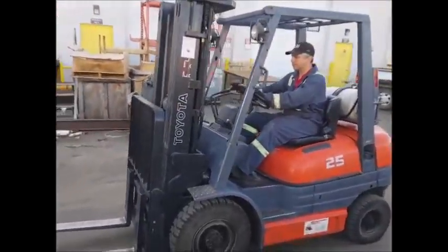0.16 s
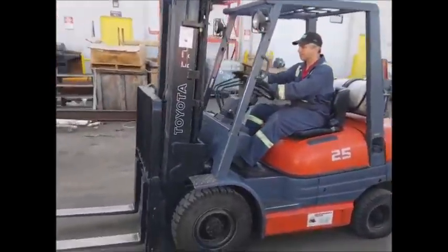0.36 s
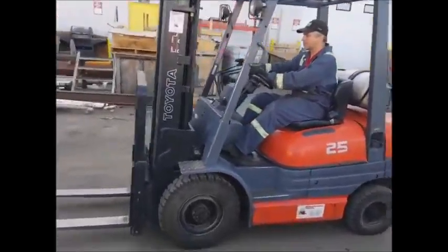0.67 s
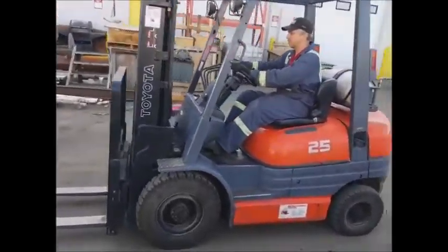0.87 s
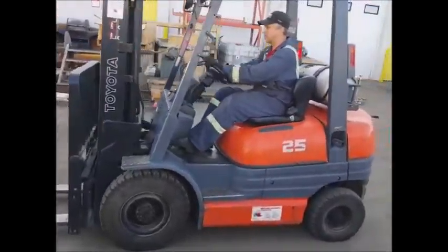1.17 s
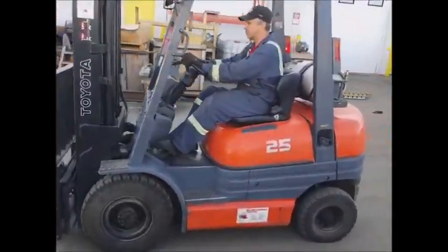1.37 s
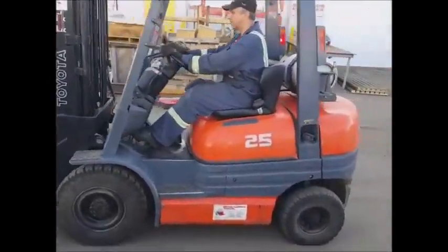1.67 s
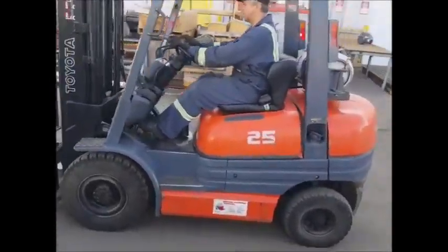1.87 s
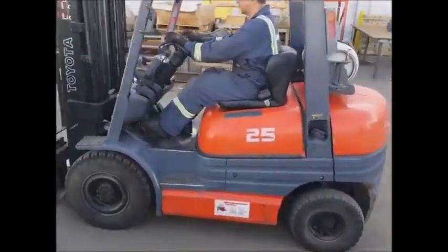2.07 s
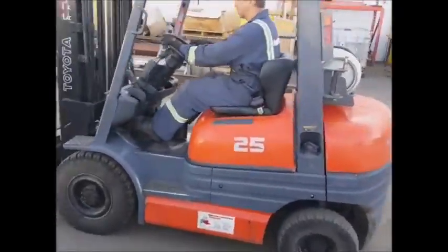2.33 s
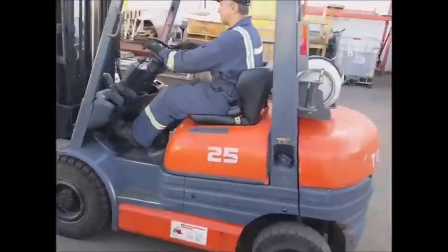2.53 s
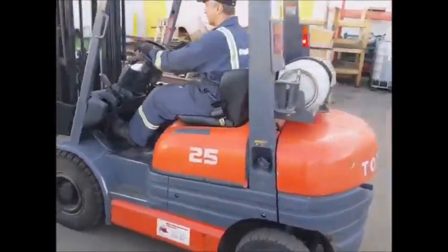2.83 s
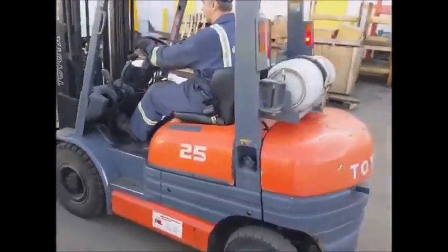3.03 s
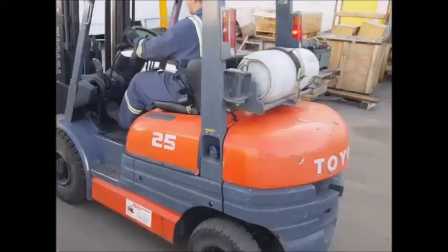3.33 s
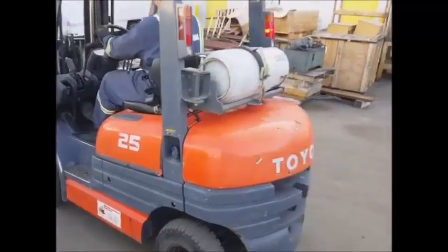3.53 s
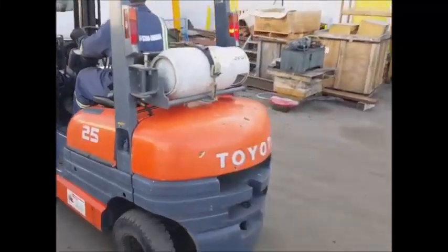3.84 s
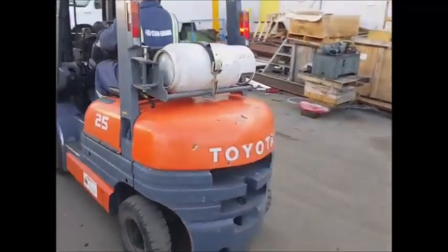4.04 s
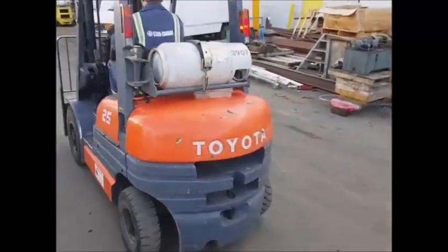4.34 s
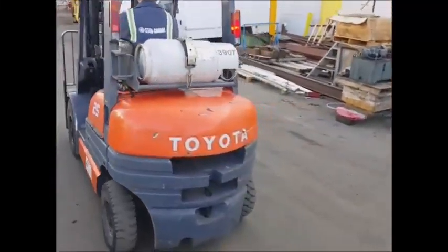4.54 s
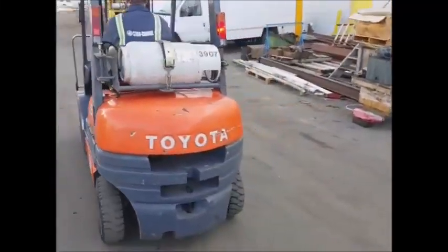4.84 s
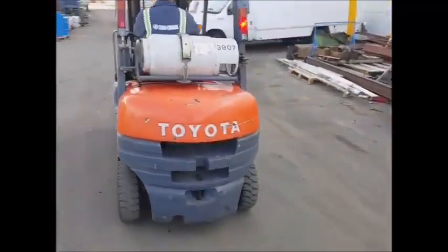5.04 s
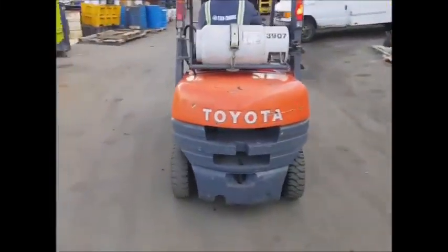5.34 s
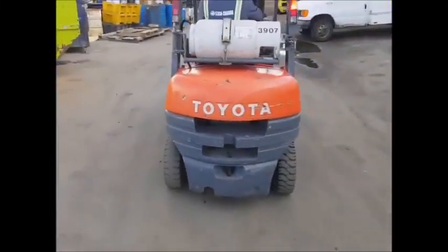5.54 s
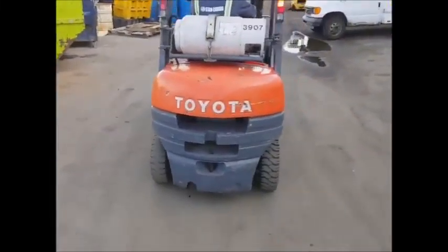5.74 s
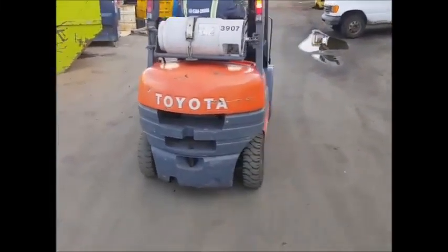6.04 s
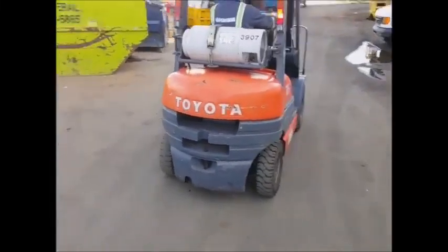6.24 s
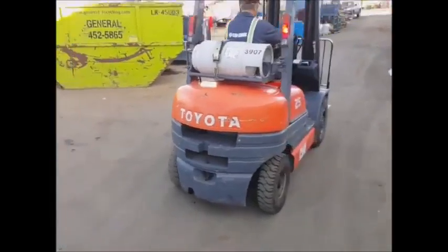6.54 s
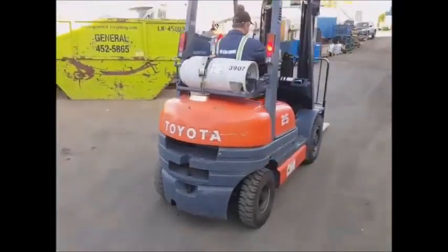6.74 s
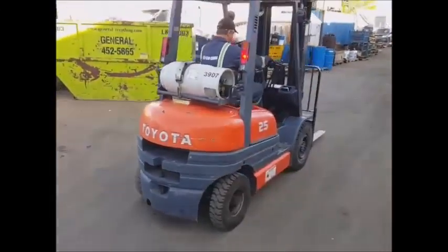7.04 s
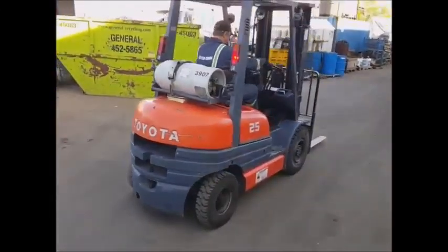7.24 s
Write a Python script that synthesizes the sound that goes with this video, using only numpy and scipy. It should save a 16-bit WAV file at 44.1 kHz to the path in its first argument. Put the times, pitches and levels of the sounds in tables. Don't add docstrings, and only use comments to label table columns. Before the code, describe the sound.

A quiet, steady engine drone with rushing air and light tyre scrub opens the scene; the engine bogs and picks up again as the forklift creeps and turns away. Thin, fine buzzing comes from the handheld microphone itself, stronger on the left, with small low wind bumps. In the last second the pickup switches abruptly, bringing a heavy throbbing drone, clearer whines, less hiss, and a single hard little knock.

```python
import sys
import numpy as np
from scipy import signal
from scipy.io import wavfile

SR = 44100
rng = np.random.default_rng(int(sys.argv[2]) if len(sys.argv) > 2 else 0)


def waveform_to_disk(signal):
    frames = np.transpose(np.atleast_2d(signal))
    scaled = np.clip(frames, -1, 1) * 32767
    samples = np.round(scaled).astype(np.int16)
    wavfile.write(sys.argv[1], SR, samples)


def to_linear_factor(level_db):
    exponent = np.asarray(level_db, float) / 20
    return 10 ** exponent


N = 326340
T = np.arange(N) / SR
SWITCH_S = 6.5072
AFTER = T >= SWITCH_S
STEADY_HZ = 59.1


def at_hz(points, hz):
    points = np.array(points)
    return np.interp(np.log(hz), np.log(points[:, 0]), points[:, 1])


def either(before, after):
    return np.where(AFTER, after, before)


def drift(rate):
    r = np.exp(-128 * np.pi * rate / SR)
    slow = signal.lfilter([1], [1, -2 * r, r * r], rng.standard_normal(N // 64 + 1502))[1500:]
    return slow / slow.std()


def fine(slow):
    return np.interp(np.arange(N) / 64, np.arange(len(slow)), slow)


def swell(middle, length):
    return np.exp(-.5 * (2 * (T - middle) / length) ** 2)


def panned(x, db):
    return np.array([x * to_linear_factor(db / 2), x * to_linear_factor(-db / 2)])


def band_pass(x, low, high):
    return signal.sosfilt(signal.butter(2, [low, high], "band", fs=SR, output="sos"), x)


def high_pass(x, low):
    return signal.sosfilt(signal.butter(2, low, "high", fs=SR, output="sos"), x)


def intake(hz):
    box_hz, box_width_hz = 226, 30
    return .2 + 1 / np.sqrt(1 + (2 * (hz - box_hz) / box_width_hz) ** 2)


def tone_levels(firing_hz, tail_db, intake_db):
    # (wide level [dB], aimed level [dB])
    tone_pairs = [(-41, -32.5), (-45.5, -26), (-57.5, -37)]
    firing, boom, exhaust = (either(*pair) for pair in tone_pairs)
    sag_db_per_hz = 0.5
    firing = firing + tail_db - sag_db_per_hz * (STEADY_HZ - firing_hz)
    return [firing, boom + intake_db, exhaust + 1.19 * tail_db]


def orders(cycle, firing_hz, levels_db, unsteady_db):
    # (multiple of the cycle rate, level [dB])
    wide_orders = [(1, -25), (2, -7), (3, -25), (4, 0), (5, -20), (6, -16), (7, -30.5), (8, -23), (9, -26),
                   (10, -25), (11, -22), (12, -36), (13, -16.5), (14, -18), (15, -5), (16, -46),
                   (17, -24.5), (18, -37), (19, -26), (20, -29), (21, -25.5), (22, -25.5), (23, -46),
                   (24, -28), (25, -28.5), (26, -37), (27, -28), (28, -26.5), (29, -28.5), (30, -28),
                   (31, -52.5), (32, -35), (33, -46), (34, -32.5), (35, -65), (36, -55)]
    aimed_orders = [(1, -35), (2, -22), (3, -27), (4, 0), (5, -33), (6, -8), (7, -22), (8, -17), (9, -20),
                    (10, -13), (11, -38), (12, -40.5), (13, -15), (14, -13), (15, -1.5), (16, -22),
                    (17, -29), (18, -44), (19, -28), (20, -34), (21, -22), (22, -17), (23, -38), (24, -20),
                    (25, -46), (26, -18.5), (27, -29), (28, -20), (29, -22.5), (30, -30), (31, -28),
                    (32, -22.5), (33, -35), (34, -33), (35, -37), (36, -52)]
    facing_orders = [22, 6, 8, 30, 34, 32, 28, 24]
    # (middle [s], length [s], rise [dB])
    facing_swells = [(2.7, 3.15, 8.5), (1.7, 0.9, 10), (1.37, 1, 13), (3.48, 1.17, 11), (5.55, 1.9, 10),
                     (3.715, 1.1, 10), (2.6, 1.9, 1.5), (5.5, 1.1, 5.5)]
    out = np.zeros(N)
    firing, boom, exhaust = to_linear_factor(np.array(levels_db))
    for (k, wide_db), (_, aimed_db) in zip(wide_orders, aimed_orders):
        if k < 11:
            level = firing * to_linear_factor(either(0, 1.9))
        else:
            if k < 21:
                level = boom * to_linear_factor(either(4.0, .6))
            else:
                level = exhaust * to_linear_factor(either(16.0, 11.0))
            level = level * intake(k * firing_hz / 4) / intake(k * STEADY_HZ / 4)
        if k in facing_orders:
            middle, length, db = facing_swells[facing_orders.index(k)]
            level = level * to_linear_factor(db * swell(middle, length))
        waver_db = unsteady_db * (-0.2 * drift(4.5) + k / 13 * drift(1.67))
        phase = k * cycle + fine(rng.uniform(0, 2 * np.pi) + 0.02 * k * drift(3.0))
        tone = fine(to_linear_factor(waver_db)) * np.sin(phase)
        out += either(to_linear_factor(wide_db), to_linear_factor(aimed_db)) * level * tone
    return np.sqrt(2) * out


def throb(cycle, turn_db, firing_db):
    return to_linear_factor(turn_db * np.cos(2 * cycle) + firing_db * np.cos(4 * cycle + 1.2))


def banded(band_edges, wide, aimed, patchy_db):
    # (frequency [Hz], likeness [-1 to 1])
    likeness = [(30, 0.87), (250, 0.949), (600, 0.44), (1200, 0.24), (2500, 0.25), (5000, 0.01),
                (16000, 0.01)]
    # (frequency [Hz], left minus right [dB])
    wide_lean = [(60, -6), (150, -6), (380, 6), (950, -2.5), (2380, -1.5), (5980, -0.5), (15000, 9)]
    aimed_lean = [(60, -2), (150, -1.5), (380, 7.5), (950, -3), (2380, -0.5), (5980, -1.5), (15000, 2.0)]
    out, together, white = 0, drift(7.0), rng.standard_normal((2, 2, N))
    half = np.array([[.5], [-.5]])
    for k, (low, high) in enumerate(zip(band_edges, band_edges[1:])):
        mid, side = band_pass(white[k % 2], low, high)
        hz = np.sqrt(low * high)
        alike = np.clip(at_hz(likeness, hz), -.9, .99)
        wide_gain = to_linear_factor(at_hz(wide, hz) + half * at_hz(wide_lean, hz))
        aimed_gain = to_linear_factor(at_hz(aimed, hz) + half * at_hz(aimed_lean, hz))
        flicker = 0.58 * together + drift(1.8) + 0.62 * drift(16.0)
        gain = either(wide_gain, aimed_gain) * fine(to_linear_factor(patchy_db * flicker))
        out = out + gain * (np.sqrt(1 + alike) * mid + np.sqrt(1 - alike) * side * [[1], [-1]])
    return out / either(out[:, ~AFTER].std(), out[:, AFTER].std())


def noise_levels():
    # (wide level [dB], aimed level [dB])
    noise_pairs = [(-54.5, -35), (-61.5, -45), (-56, -49.5)]
    # (wide change [dB/s], aimed change [dB/s])
    recede = [(-0.36, -2.5), (0.16, -1.5), (-0.17, -2)]
    # (middle [s], length [s], hiss [dB], roar [dB], rush [dB])
    labours = [
        (.15, 0.27, -2, -1.5, -2.5),
        (0.41, .2, 3.5, .5, 3.5),
        (0.844, .3, 3, 3.5, 4),
        (1.395, 0.46, -0.3, 0.5, 1),
        (1.92, 0.66, 3.5, 1.2, 1),
        (2.787, 0.68, 1.5, 1.5, 1.5),
        (3.55, 0.13, 1, 1, 1.5),
        (3.73, .06, 0.5, 1.2, 2),
        (4.452, 0.14, .5, 0, 2),
        (5.6, 0.91, 1.2, -0.2, 0.6),
    ]
    roar, rush, hiss = (either(wide + a * T, aimed + b * (T - SWITCH_S))
                        for (wide, aimed), (a, b) in zip(noise_pairs, recede))
    for middle, length, hiss_db, roar_db, rush_db in labours:
        held = np.exp(-.5 * (2 * (T - middle) / length) ** 4)
        roar, rush, hiss = roar + roar_db * held, rush + rush_db * held, hiss + hiss_db * held
    return roar, rush, hiss


def whines(cycle):
    whine_pitches = [660, 1545, 1985, 2480, 885, 1750, 2165, 2169, 1560, 1104, 1104, 2166, 2229, 2170, 1985,
                     1757, 1100, 900, 660, 3980, 224, 228, 502, 2180, 660, 443, 1600, 2150, 325]
    # (middle [s], length [s], level [dB], left minus right [dB])
    whine_swells = [(1.75, 1.03, -63.5, -6), (2.23, 0.79, -64, -8), (1.9, 0.71, -66, -10),
                    (1.4, 0.26, -68.5, -6), (1.1, 4.1, -69, -2), (2.8, 1.4, -69.5, -12),
                    (2.81, 0.9, -65, -1), (3.66, 0.71, -63, -10.5), (4.24, 2.8, -71, -10),
                    (2.9, 1.5, -67.5, -5), (5.1, 0.933, -63, -4), (5.62, 0.48, -59.5, -6),
                    (6.7, 0.36, -44.5, 2), (6.61, 1.2, -47.5, -4), (7, 1.1, -50, -6),
                    (7.38, 0.71, -46.5, -5), (7.2, 2.8, -50.5, -1), (7.4, 2.05, -50.5, -2),
                    (6.52, 4, -50, 0), (7.1, 0.85, -58, -5), (1.05, 0.27, -48.5, 1), (0.55, 0.27, -52.5, 8),
                    (6.8, 1.15, -58, 5), (6.38, .5, -67, -2), (4.1, 2.7, -71, 0), (5.2, 0.73, -62, 0.),
                    (0.27, .6, -69, -4), (.2, .6, -68.5, -4), (3.77, .7, -59.5, 0.)]
    geared_hz = 660
    out = 0
    for hz, (middle, length, db, pan_db) in zip(whine_pitches, whine_swells):
        turn = cycle * 4 * hz / STEADY_HZ if hz == geared_hz else 2 * np.pi * hz * T
        width_hz = 4 + .011 * hz
        steady = 24 / width_hz
        tone = (steady + fine(drift(width_hz))) * np.sin(turn) + fine(drift(width_hz)) * np.cos(turn)
        tone /= np.sqrt(1 + steady ** 2 / 2)
        same_side = AFTER == (middle > SWITCH_S)
        out = out + panned(to_linear_factor(db) * tone * swell(middle, length) * same_side, pan_db)
    settle_s = 0.062
    return out * throb(cycle, 2.0, 0.53) * either(0.99, np.clip((T - SWITCH_S) / settle_s, .3, 1))


def scrub():
    # (middle [s], length [s], level [dB])
    twists = [
        (.4, 0.2, -63),
        (0.572, .12, -64),
        (.85, .3, -65),
    ]
    grit = band_pass(rng.standard_normal((2, N)), 2420, 3900)
    pressure = sum(to_linear_factor(db) * swell(middle, length) for middle, length, db in twists)
    return pressure * fine(to_linear_factor(2.0 * drift(15.0))) * grit / grit.std()


def knock():
    # (time [s], peak level [dB])
    blows = [
        (7.168, -16),
    ]
    since = np.maximum(T - blows[0][0], 0)
    ring = np.sin(2 * np.pi * 1150 * since) + 0.37 * np.sin(2 * np.pi * 2100 * since)
    return high_pass(to_linear_factor(blows[0][1]) * ring * np.exp(-since / .0012), 600)


def buzz():
    # (start [s], stop [s], level [dB])
    motor_runs = [
        (-.1, .535, 0),
        (2.6, 4.07, 0),
    ]
    # (multiple of the turning rate, left level [dB], right level [dB])
    hum_tones = [(1, -47, -45), (2, -68, -57.5), (3, -68, -58)]
    # (share of a turn [0 to 1], level [dB])
    touches = [(.9, -35.5), (.0026, -43.5), (.567, -42.5)]
    motor_hz = 233.136
    on = sum(to_linear_factor(db) * np.clip((T - start) / 0.054, 0, 1) * np.clip((stop - T) / 0.034, 0, 1)
             for start, stop, db in motor_runs)
    twist = np.array([[np.pi / 4], [0]])
    hum = 0
    for k, left, right in hum_tones:
        tone = np.sin(2 * np.pi * k * motor_hz * T + twist * (k - 1) ** 2)
        hum = hum + to_linear_factor(np.array([[left], [right]])) * np.sqrt(2) * tone
    ticks = 0
    for share, db in touches:
        since = (T * motor_hz - share) % 1 / motor_hz
        ring = np.sin(2 * np.pi * 9000 * since) + .25 * np.sin(2 * np.pi * 10900 * since)
        ticks = ticks + to_linear_factor(db) * ring * np.exp(-since / .00022)
    ticks = high_pass(ticks, 7400) * fine(to_linear_factor(1.5 * drift(8.0)))
    return on * (hum + ticks * to_linear_factor(np.array([[0], [-14.0]])))


def wind():
    # (middle [s], length [s], level [dB], top frequency [Hz])
    gusts = [(0.55, 0.26, -58, 150), (1.257, 0.046, -46.5, 150), (2.639, 0.064, -44.5, 198),
             (2.76, 0.058, -38.5, 207), (3.413, 0.14, -45.5, 220), (3.94, 0.15, -44.5, 194),
             (4.052, 0.071, -41, 238), (4.517, 0.086, -45, 250), (4.77, 0.25, -48.5, 185),
             (5.063, 0.05, -43.5, 198), (5.703, 0.14, -70, 120), (6.2, 0.13, -55, 100),
             (7.3, 0.18, -52, 120)]
    white = rng.standard_normal((2, N))
    out = to_linear_factor(either(-33.5, -19.5)) * fine(to_linear_factor(1.6 * drift(5.9))) * band_pass(white, 18, 90)
    heavy = signal.sosfilt(signal.butter(1, 90, fs=SR, output="sos"), white)
    for middle, length, db, top_hz in gusts:
        puff = band_pass(heavy, 30, top_hz)
        out += to_linear_factor(db + 3.5) * swell(middle, 0.95 * length) * puff / puff.std()
    return out


def scene():
    # (time [s], firing rate [Hz])
    speed = [(.3, 57.6), (.42, 55), (.58, 46.7), (.65, 46), (.95, 47.4), (1.1, 53.4), (1.18, 55.4),
             (1.55, 57.9), (1.9, 58.95), (2.3, 58.7), (2.7, 59.1), (3.4, 59.3), (3.7, 58.9), (4.5, 59.17),
             (4.9, 59.46), (5.3, 59.43), (5.9, 58.9), (7.4, 59.18)]
    # (time [s], tail pipe toward recorder [dB], intake toward it [dB], left minus right [dB])
    pose = [(0, -3, -3, 1), (.3, -6, -5.5, 0), (1.25, -3, -3, -0.5), (1.6, -5.5, -6, -0.5),
            (2.2, 0, -7, -0.5), (2.9, 0, -5, -0.5), (3.9, 1, 0.5, 0), (4.8, -0.5, -3.5, 0.5),
            (5.4, -0.5, 0, -2), (6.5, -1, -2, -0.5), (6.55, -1, -7, 0), (6.62, 0.5, 3, 0),
            (7.0, 0, -2.5, -0.5), (7.4, -1.5, 0.5, 0)]
    # (frequency [Hz], level [dB per Hz])
    wide_roar = [(25, -10), (45, -11), (80, -9), (161, -19), (220, -8), (284, -24), (420, -22),
                 (563, -18.5), (975, -24.5), (1150, -23.5), (1860, -22), (2180, -21), (2700, -29)]
    aimed_roar = [(15, -38), (25, -20), (64, -15), (155, -10), (220, -3.5), (278, -16.5), (412, -13.5),
                  (542, -36), (659, -9), (994, -26), (1100, -16.5), (2180, -20), (2700, -23), (3510, -66),
                  (5940, -120)]
    # (frequency [Hz], level [dB per Hz])
    wide_hiss = [(1470, -35), (2500, -5), (2700, -8), (3990, -4), (5050, -6.5), (6070, -5), (7240, -5),
                 (9040, 2.5), (11000, -7), (13300, -16.5), (14600, -13.5), (15600, -18.5)]
    aimed_hiss = [(1470, -30), (2500, -19), (2980, -3), (4050, -4.5), (5170, -11), (8060, -9), (10300, -16),
                  (12300, -12.5), (14700, -13), (15600, -14)]
    # (wide left minus right [dB], aimed left minus right [dB])
    noise_lean = [(-3, -3.5), (-1.2, 1)]
    firing_hz = np.interp(T, *np.transpose(speed))
    pose_s, *pose_db = np.transpose(pose)
    tail_db, intake_db, bearing_db = (np.interp(T, pose_s, column) for column in pose_db)
    roar_db, rush_db, hiss_db = noise_levels()
    pan_db, hiss_pan_db = (either(*pair) + bearing_db for pair in noise_lean)
    cycle = np.cumsum(2 * np.pi * firing_hz / 4 / SR)
    tones = orders(cycle, firing_hz, tone_levels(firing_hz, tail_db, intake_db), unsteady_db=1.06)
    roar = banded(np.geomspace(25, 2600, num=19), wide_roar, aimed_roar, patchy_db=0.75)
    roar *= to_linear_factor(roar_db + either(4.44, 4.3)) * throb(cycle, 0.4, 0.6)
    rush = banded(np.geomspace(2600, 6500, num=8), wide_hiss, aimed_hiss, patchy_db=1.28)
    rush *= to_linear_factor(rush_db + 2.0) * throb(cycle, 0.45, 0.4)
    hiss = banded(np.geomspace(6500, 16000, num=11), wide_hiss, aimed_hiss, patchy_db=0.84)
    hiss *= to_linear_factor(hiss_db + 3.0) * throb(cycle, 0.866, 0.45)
    sides = np.array([[.5], [-.5]])
    machine = (roar + rush) * to_linear_factor(0.38 * pan_db * sides) + hiss * to_linear_factor(hiss_pan_db * sides) + whines(cycle)
    return panned(tones, -0.036) + machine + scrub() + knock() + buzz() + wind()


def top_cut(x):
    return signal.sosfilt(signal.butter(12, 15710, fs=SR, output="sos"), x)


def record(dry):
    dip_db = -3.0 * np.exp(-np.abs(T - SWITCH_S) / 0.021)
    settled = dry * to_linear_factor(either(0, dip_db))
    return top_cut(high_pass(settled, 18))


dry = scene()
out = record(dry)
waveform_to_disk(out)
```